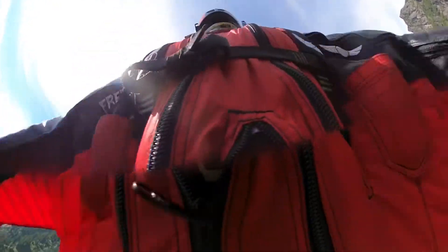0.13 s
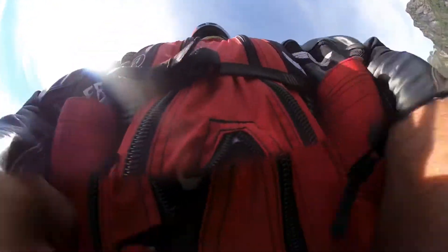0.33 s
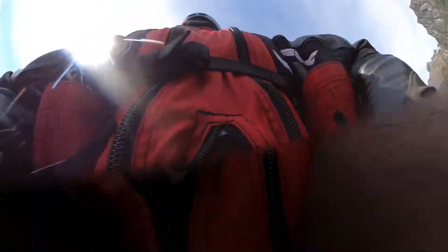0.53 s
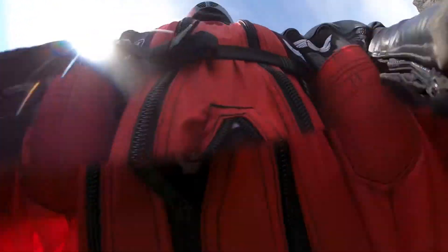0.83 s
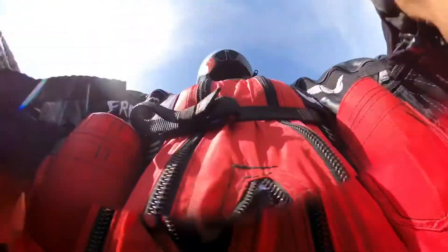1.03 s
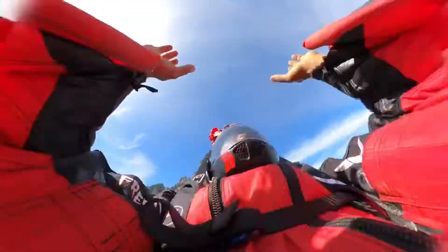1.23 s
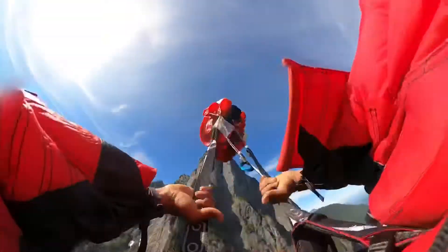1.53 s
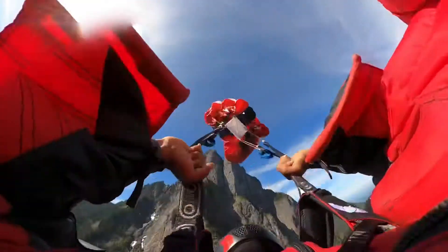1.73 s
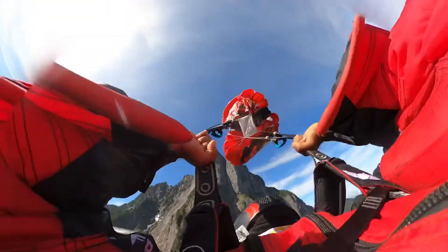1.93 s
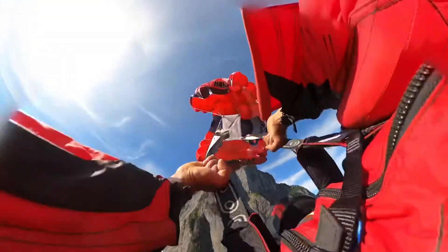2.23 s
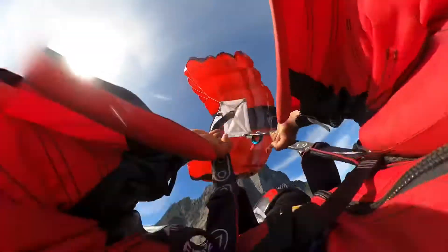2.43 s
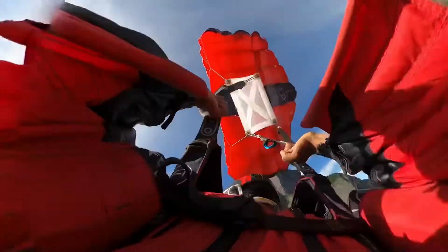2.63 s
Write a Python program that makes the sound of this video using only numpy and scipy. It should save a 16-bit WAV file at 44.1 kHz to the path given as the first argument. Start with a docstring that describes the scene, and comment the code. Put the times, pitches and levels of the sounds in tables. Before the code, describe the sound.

Wind buffets a body-worn microphone outdoors, with muffled low rumble and soft thumps growing from 0 to 0.85 s and a faint strap click near 0.57. At 0.87 s the harness cracks tight with a short metallic ring. Harsh tearing gusts, heavy thumps and rapidly beating nylon peak until about 1.4 s. Then uneven thumps and dull flaps fade by 2 s, leaving quieter rumble, faint rustle and small ticks.

```python
"""Low wind rumble and thumps come first: air buffets a body-worn microphone on a wingsuit flight.
The harness snaps tight as the parachute opens, and the wind then thumps and tears at its hardest.
After that the air slows; suit and canopy rustle, flap and tick.
Wind and cloth are shaped noise, thumps are short swings of pressure, and metal rings as fading sines."""
import sys
import numpy as np
from scipy import signal
from scipy.fft import rfft, irfft
from scipy.io import wavfile
from scipy.ndimage import uniform_filter1d, minimum_filter1d, map_coordinates

SR = 44100
rng = np.random.default_rng(int(sys.argv[2]) if len(sys.argv) > 2 else 0)


def output_pcm(signal):
    """Save a mono or channel-first signal as 16-bit PCM at the path in sys.argv[1].

    Samples are clipped to [-1, 1] before scaling.
    """
    pcm = np.clip(np.atleast_2d(signal).T, -1, 1) * 32767
    wavfile.write(sys.argv[1], SR, np.round(pcm).astype(np.int16))


N = 123479


def undb(db):
    """Turn decibels into a gain."""
    return 10 ** (np.asarray(db) / 20)


def unit(x):
    """Scale to an average strength (rms) of 1."""
    return x / np.sqrt(np.mean(x ** 2) + 1e-18)


def colour(x, points):
    """Filter by a spectrum of (Hz, dB) points, then scale to rms 1."""
    hz, db = np.array(points, float).T
    bin_hz = np.maximum(np.arange(N // 2 + 1) * SR / N, 1)
    gain = undb(np.interp(np.log(bin_hz), np.log(hz), db))
    return unit(irfft(rfft(x) * gain, N))


def noise(points):
    """Steady noise with the given spectrum."""
    return colour(rng.standard_normal(N), points)


def walk(rate):
    """Smooth random wandering with about rate new values a second; rms 1."""
    values = rng.standard_normal(N // 8)
    return unit(map_coordinates(values, [np.arange(N) * rate / SR], order=3, mode="mirror"))


def gain_curve(rows, axis=1):
    """Join one dB column of a time table into a gain for every sample."""
    rows = np.array(rows, float)
    return undb(np.interp(np.arange(N) / SR, rows[:, 0], rows[:, axis]))


def burst(at, rise, decay):
    """Envelope that swells up to a moment and dies away."""
    t = np.arange(N) / SR - at
    return np.exp(np.minimum(t / rise, -t / decay))


def eddies(points, size):
    """Pressure swings of similar strength: noise evened out over about size samples."""
    x = noise(points)
    power = uniform_filter1d(uniform_filter1d(x ** 2, size), size)
    return unit(x / np.sqrt(power + 1e-6))


# How loud the suit rustles in flight. Each row: time in seconds, level in dB before RUSTLE_DB.
RUSTLE_FLIGHT_LEVELS = [(0.02, -64), (0.264, -56.5), (0.36, -61.5), (0.55, -61), (0.6, -58), (0.74, -60.5),
                        (0.83, -51.5)]
# Suit and canopy rustling as the parachute opens. Each row: time in seconds, level in dB before RUSTLE_DB.
RUSTLE_OPENING_LEVELS = [(0.9, -51), (1.014, -45.5), (1.075, -49.5), (1.166, -39.5), (1.234, -58),
                         (1.308, -47.5), (1.41, -58), (1.46, -58), (1.57, -63), (1.595, -56.5), (1.72, -76),
                         (1.84, -65), (1.91, -72), (2.056, -69.5), (2.085, -56.5), (2.16, -67),
                         (2.26, -56.5), (2.32, -62.5), (2.44, -60), (2.78, -58)]
# Tone of the rustle, also used for the ticks. Each row: frequency in Hz, relative strength in dB per Hz.
RUSTLE_SPECTRUM = [(500, -8), (1500, 4.5), (2600, -0.5), (3600, -2), (5000, -6.5), (6500, -12.5),
                   (8200, -22), (10500, -32.5), (14000, -51.5)]
RUSTLE_DB, RUSTLE_FLUTTER_DB = 1.5, 1.0  # overall lift, and how far the flutter moves the level
CREASE_PER_S, CREASE_SPREAD_DB = 12000, 2.0


def rustle(flutter):
    """Thousands of tiny creases snap in the nylon, shaken by the flutter."""
    happens = rng.random(N) < CREASE_PER_S / SR
    sizes = undb(CREASE_SPREAD_DB * rng.standard_normal(N))
    creases = happens * rng.standard_normal(N) * sizes
    level = gain_curve(list(RUSTLE_FLIGHT_LEVELS) + list(RUSTLE_OPENING_LEVELS))
    return colour(creases, RUSTLE_SPECTRUM) * level * undb(RUSTLE_DB + RUSTLE_FLUTTER_DB * flutter)


# Ticks of lines and stiff fabric. Each row: time in seconds, level in dB, decay in seconds.
TICK_EVENTS = [(1.058, -28.5, 0.0018), (1.437, -44.5, 0.003), (1.4935, -41.5, 0.003), (1.585, -46, 0.012),
               (2.108, -50, 0.0016), (2.667, -45, 0.007)]
TICK_RISE_S = 0.0005


def ticks():
    """Lines and stiff fabric jerk: very short bursts of bright noise."""
    envelope = sum(undb(db) * burst(at, TICK_RISE_S, decay) for at, db, decay in TICK_EVENTS)
    return eddies(RUSTLE_SPECTRUM, size=300) * envelope


# Single flaps of the cloth. Each row: time in seconds, level in dB.
FLAP_EVENTS = [(0.127, -33), (1.083, -25), (1.266, -26), (1.322, -23), (1.62, -30), (1.665, -33),
               (1.871, -32)]
# Tone of a flap. Each row: frequency in Hz, relative strength in dB per Hz.
FLAP_SPECTRUM = [(90, -8), (220, 8), (450, 0), (800, -2), (1500, -16), (3000, -25), (4500, -41),
                 (9000, -80)]
FLAP_RISE_S, FLAP_DECAY_S = 0.0018, 0.008


def flaps():
    """The cloth jerks once and slaps the air: short bursts of duller noise."""
    envelope = sum(undb(db) * burst(at, FLAP_RISE_S, FLAP_DECAY_S) for at, db in FLAP_EVENTS)
    return eddies(FLAP_SPECTRUM, size=300) * envelope


# Loose nylon beating in the hardest gusts. Each row: time in seconds, level in dB.
FLOGGING_LEVELS = [(0.88, -90), (0.93, -45), (1.02, -35.5), (1.17, -36), (1.24, -47.5), (1.31, -40.5),
                   (1.43, -64), (1.64, -51), (1.75, -87.5)]
# Tone of the beating nylon. Each row: frequency in Hz, relative strength in dB per Hz.
FLOG_SPECTRUM = [(500, -12.5), (1400, 0.5), (3700, -8.5), (8000, -46.5)]
FLOG_PER_S, FLOG_JITTER = 85, 0.4  # typical beats a second, and how uneven their gaps are
FLOG_SPREAD_DB, FLOG_DECAY_S = 2, 0.004


def flogging():
    """Loose nylon beats in the gust: a fast, uneven train of small noisy slaps."""
    gaps, sizes = rng.standard_normal((N // 100, 2)).T
    at = (np.cumsum(np.exp(FLOG_JITTER * gaps)) * SR / FLOG_PER_S).astype(int)
    inside = at < N
    beats = np.bincount(at[inside], undb(FLOG_SPREAD_DB * sizes[inside]), N)
    # Soften each beat's start, then let it die away.
    beats = np.convolve(beats, np.hanning(int(FLAP_RISE_S * SR)), "same")
    envelope = unit(signal.lfilter([1], [1, -np.exp(-1 / (FLOG_DECAY_S * SR))], beats))
    return noise(FLOG_SPECTRUM) * envelope * gain_curve(FLOGGING_LEVELS)


# Harness snaps. Each row: time in seconds, then levels in dB of the crack, the ring and the scuff after it.
SNAP_EVENTS = [(0.5705, -42.5, -55, -44.5), (0.8663, -17.5, -24.5, -38.5)]
# Notes the metal rings with. Each row: frequency in Hz, relative level in dB, seconds to fade by 60 dB.
HARDWARE_MODES = [(1400, -3, 0.08), (1930, -5, 0.07), (2080, 0, 0.095), (2510, -6, 0.056), (3100, -5, 0.06),
                  (5830, -20, 0.055)]
# Tone of the crack. Each row: frequency in Hz, relative strength in dB per Hz.
CRACK_SPECTRUM = [(300, -12), (1450, 1), (1950, 1), (2350, -3), (2900, 1), (3600, -2), (4600, -19),
                  (6000, -23), (7500, -38), (12000, -39)]
# Tone of the scuff. Each row: frequency in Hz, relative strength in dB per Hz.
SCUFF_SPECTRUM = [(900, -18), (1450, 0), (2050, 1), (2500, -13), (7000, -34)]
SNAP_RISE_S, SNAP_CONTACT_S, SCUFF_DECAY_S = 0.0022, 0.0028, 0.026
RATTLE_DB, RATTLE_S = -12, 0.01  # level against the crack, and decay
RING_WAVER, WAVER_PER_S = 0.35, 250  # share by which the ring's strength wavers, and how fast


def snaps():
    """Webbing cracks tight, its metal fittings rattle and ring, and the strap scuffs as it settles."""
    out = np.zeros(N)
    scuff = noise(SCUFF_SPECTRUM)
    for at, crack_db, ring_db, scuff_db in SNAP_EVENTS:
        t = np.maximum(np.arange(N) / SR - at, 0)
        ring = np.zeros(N)
        for hz, mode_db, t60 in HARDWARE_MODES:
            ring += undb(mode_db - 60 * t / t60) * np.sin(2 * np.pi * hz * t) * rng.choice([-1, 1])
        ring *= 1 + RING_WAVER * walk(WAVER_PER_S)
        contact = burst(at, SNAP_RISE_S, SNAP_CONTACT_S)
        rattle = undb(RATTLE_DB) * burst(at, SNAP_RISE_S, RATTLE_S)
        crack = eddies(CRACK_SPECTRUM, size=100) * (contact + rattle)
        out += undb(ring_db) * ring + undb(crack_db) * crack
        out += undb(scuff_db) * scuff * burst(at, SNAP_RISE_S, SCUFF_DECAY_S)
    return out


# Big eddies that thump on the microphone. Each row: time in seconds, level in dB, frequency in Hz.
THUMP_EVENTS = [(0.125, -22.5, 148), (0.24, -18, 85), (0.299, -21, 111), (0.419, -18, 89),
                (0.47, -20, 54.4), (0.53, -19, 92), (0.65, -14.5, 49.6), (0.897, -9.5, 139),
                (1.242, -6.5, 56.4), (1.359, -12.5, 48.3), (1.554, -13.5, 146), (1.637, -17, 85),
                (1.684, -10.5, 160), (1.835, -19, 85), (1.868, -18.5, 150), (1.974, -17.5, 70),
                (2.254, -24, 60), (2.486, -16, 65)]
THUMP_CYCLES = 0.59  # cycles from the middle until the swell has fallen to 1/e


def thumps():
    """Each big eddy that hits the port is one swing of pressure, longer the lower it is."""
    out = np.zeros(N)
    for at, db, hz in THUMP_EVENTS:
        cycles = (np.arange(N) / SR - at) * hz
        swell = np.exp(-(cycles / THUMP_CYCLES) ** 2)
        out += undb(db) * swell * np.sin(2 * np.pi * (cycles + rng.random()))
    return out


# The next three tables follow the air at the port, before the small lifts RUMBLE_DB, BUFFET_DB and TEAR_DB.
# Flight. Each row: time in seconds, then levels in dB of big, small and finest eddies.
WIND_FLIGHT_LEVELS = [(0.02, -31.5, -46.5, -54.5), (0.18, -29.5, -42.5, -51), (0.28, -26.5, -38, -46.5),
                      (0.35, -30.5, -39, -54.5), (0.6, -24.5, -39, -51.5), (0.675, -23.5, -38.5, -47.5),
                      (0.70, -25.5, -34, -44), (0.815, -17, -31, -42.5), (0.848, -19, -28.5, -37.5)]
# Hardest gusts. Each row: time in seconds, then levels in dB of big, small and finest eddies.
WIND_GUST_LEVELS = [(0.895, -14, -17, -43.5), (0.925, -21.5, -21, -35), (1.003, -15.5, -18, -24.5),
                    (1.17, -14, -17.5, -28), (1.225, -17, -18.5, -34), (1.243, -16.5, -24, -44),
                    (1.283, -26, -20, -34), (1.315, -8.5, -14.5, -24.5), (1.347, -14.5, -24.5, -39),
                    (1.385, -23, -20.5, -32)]
# Slowing air. Each row: time in seconds, then levels in dB of big, small and finest eddies.
WIND_OPENING_LEVELS = [(1.42, -23.5, -36.5, -55.5), (1.45, -25, -34, -40), (1.50, -29, -37.5, -52),
                       (1.56, -17.5, -30, -51), (1.62, -18, -24, -46), (1.69, -19.5, -31, -47),
                       (1.77, -27, -39.5, -55.5), (1.92, -28.5, -40.5, -64), (1.99, -26.5, -36.5, -51.5),
                       (2.165, -39.5, -46, -70.5), (2.25, -22, -37, -57.5), (2.305, -35, -42.5, -63.5),
                       (2.35, -28.5, -42.5, -59), (2.46, -25.5, -33.5, -45), (2.55, -29.5, -39.5, -55.5),
                       (2.645, -41, -49, -57.5), (2.675, -39, -39.5, -52), (2.715, -38, -50, -74),
                       (2.77, -31, -42.5, -50.5)]
# Rumble of big eddies. Each row: frequency in Hz, relative strength in dB per Hz.
RUMBLE_SPECTRUM = [(10, -15.5), (22, 3.5), (55, -1.5), (85, -6), (115, -4.5), (160, -22), (300, -39.5),
                   (600, -93)]
# Buffeting of small eddies. Each row: frequency in Hz, relative strength in dB per Hz.
BUFFET_SPECTRUM = [(70, -17), (120, -0.5), (170, 1.5), (260, -6), (370, -9), (600, -17), (850, -24.5),
                   (1400, -34.5), (3000, -87.5)]
# Tearing of the finest eddies. Each row: frequency in Hz, relative strength in dB per Hz.
TEAR_SPECTRUM = [(200, -30.5), (450, 2), (750, 4.5), (1050, -1), (1500, -6.5), (2300, -15), (3100, -20.5),
                 (4400, -27.5), (6300, -48.5), (11000, -81)]
RUMBLE_DB, BUFFET_DB, TEAR_DB = 1, 0.5, 0.5
RUMBLE_FLUTTER_DB, BUFFET_FLUTTER_DB, TEAR_FLUTTER_DB = 1.5, 1.1, 1.1
BURST_PER_S, BURST_DB = 690, 1.5  # how fast the tearing comes and goes, and how far


def wind(flutter):
    """Eddies of three sizes flutter together; the finest tear most while the small ones' pressure rises."""
    flow = list(WIND_FLIGHT_LEVELS) + list(WIND_GUST_LEVELS) + list(WIND_OPENING_LEVELS)
    rumble = eddies(RUMBLE_SPECTRUM, size=1300) * unit(undb(RUMBLE_FLUTTER_DB * flutter))
    buffet = eddies(BUFFET_SPECTRUM, size=700) * unit(undb(BUFFET_FLUTTER_DB * flutter))
    slope = unit(np.gradient(buffet))
    bursts = unit(walk(BURST_PER_S) + 4.6 * np.tanh(slope))
    tear = noise(TEAR_SPECTRUM) * unit(undb(TEAR_FLUTTER_DB * flutter + BURST_DB * bursts))
    out = rumble * gain_curve(flow, axis=1) * undb(RUMBLE_DB)
    out += buffet * gain_curve(flow, axis=2) * undb(BUFFET_DB)
    out += tear * gain_curve(flow, axis=3) * undb(TEAR_DB)
    return out


FLUTTER_PER_S = 95


def scene():
    """Fabric, harness and wind at one microphone; one flutter moves both wind and rustle."""
    flutter = walk(FLUTTER_PER_S)
    cloth = rustle(flutter) + ticks() + flaps() + flogging()
    return (cloth + snaps() + thumps() + wind(flutter))[None]


TOP_HZ = 11800


def record(dry):
    """A limiter holds down peaks above 0.68 of full scale; a steep filter cuts the top."""
    need = np.minimum(1, .68 / (np.abs(dry) + 1e-9))
    # Hold each dip in gain over 400 samples, then smooth it.
    gain = uniform_filter1d(minimum_filter1d(need, size=400), size=400)
    top_cut = signal.ellip(8, .2, 70, TOP_HZ, fs=SR, output="sos")
    return signal.sosfilt(top_cut, dry * gain)


dry = scene()
out = record(dry)
output_pcm(out)
```